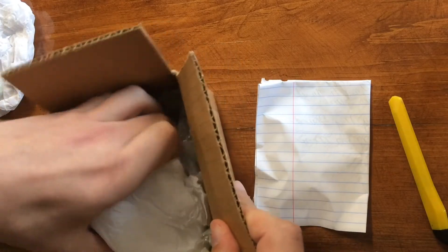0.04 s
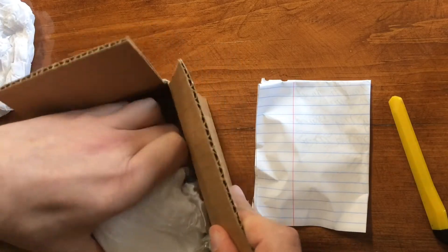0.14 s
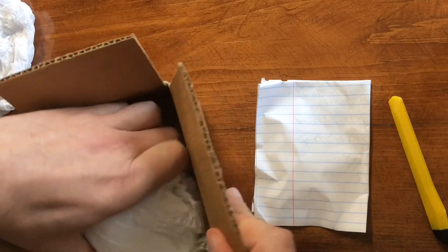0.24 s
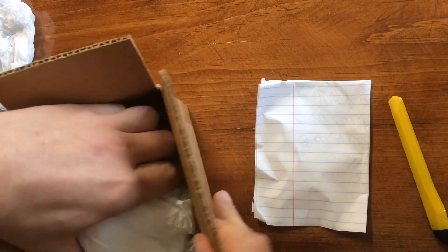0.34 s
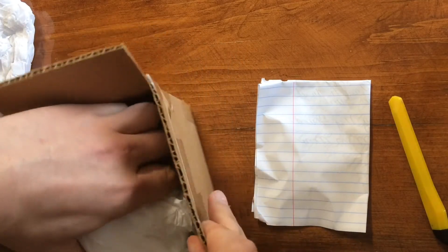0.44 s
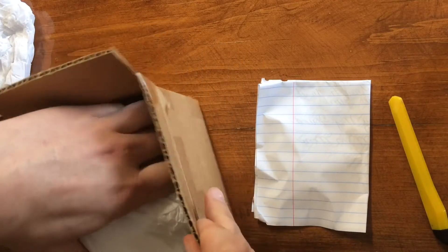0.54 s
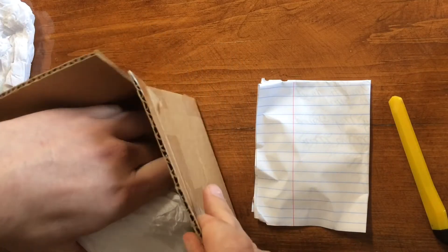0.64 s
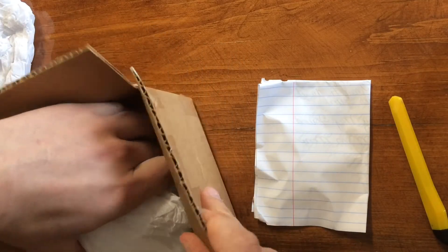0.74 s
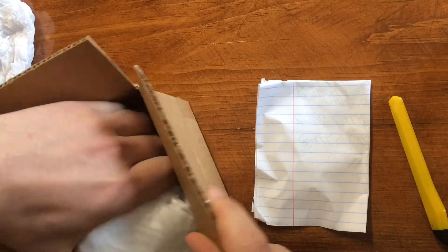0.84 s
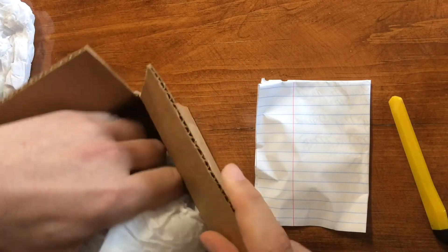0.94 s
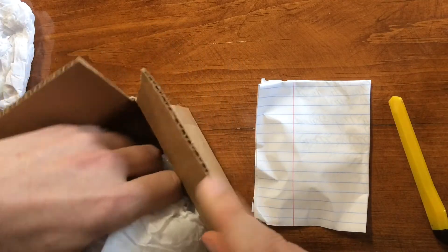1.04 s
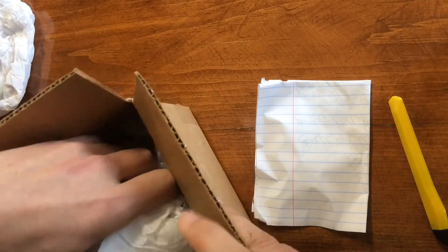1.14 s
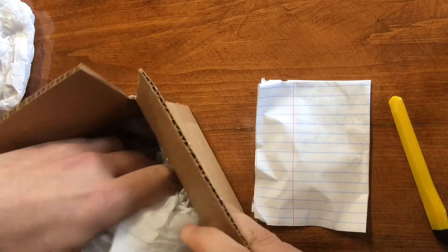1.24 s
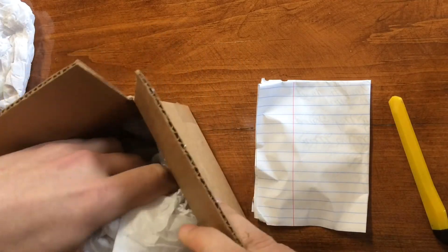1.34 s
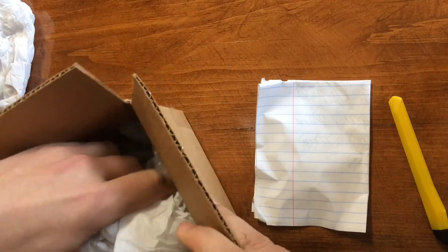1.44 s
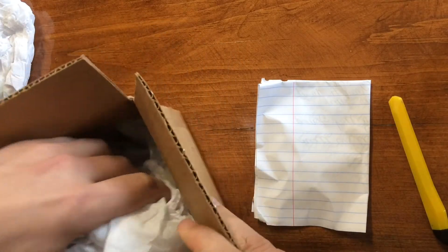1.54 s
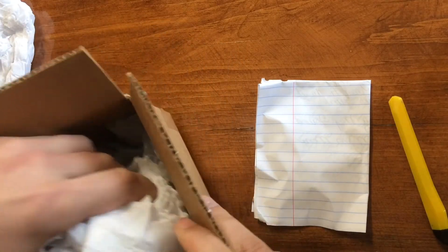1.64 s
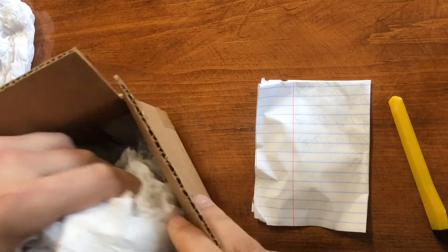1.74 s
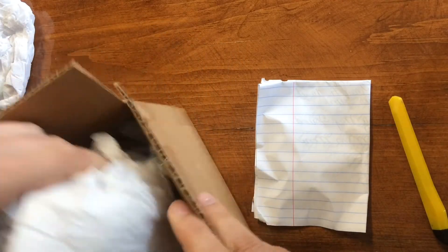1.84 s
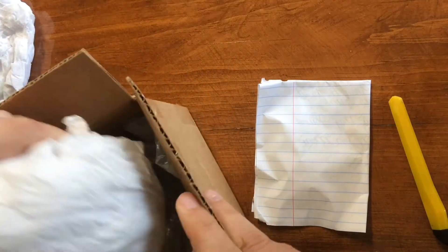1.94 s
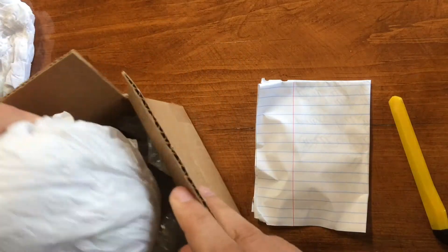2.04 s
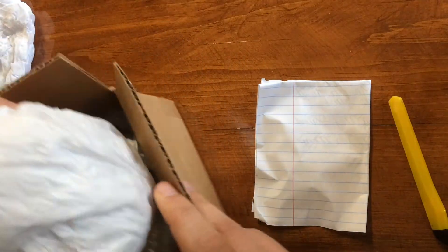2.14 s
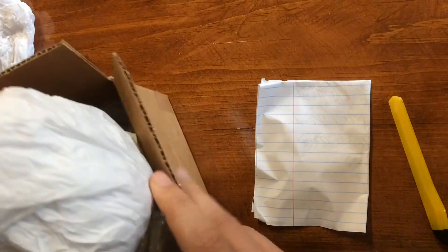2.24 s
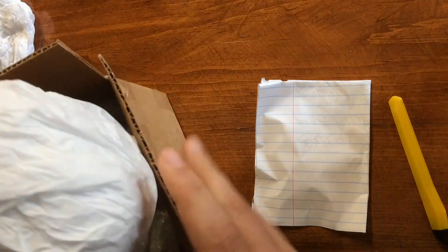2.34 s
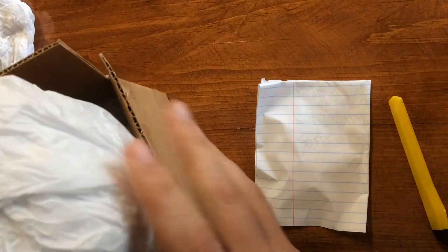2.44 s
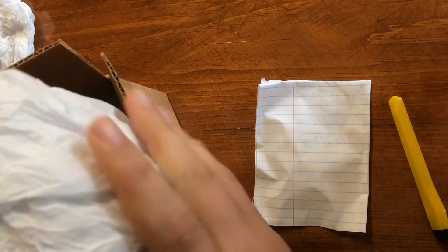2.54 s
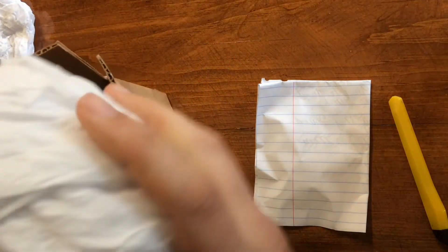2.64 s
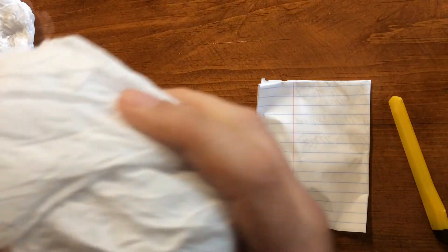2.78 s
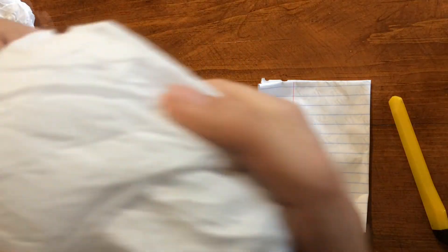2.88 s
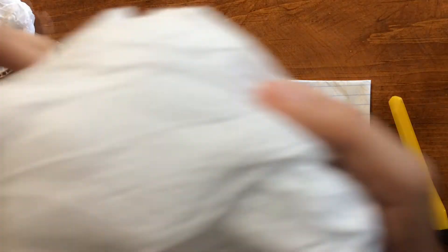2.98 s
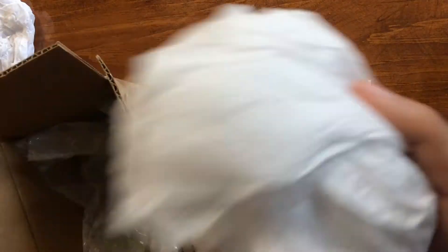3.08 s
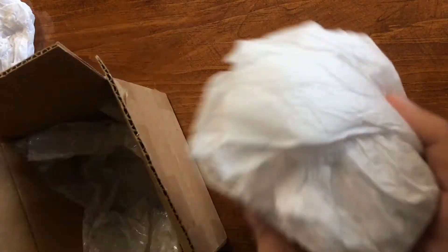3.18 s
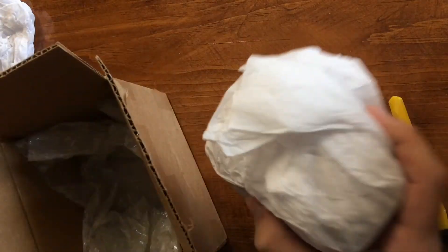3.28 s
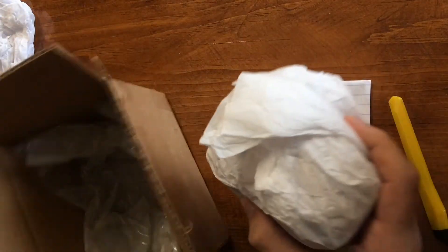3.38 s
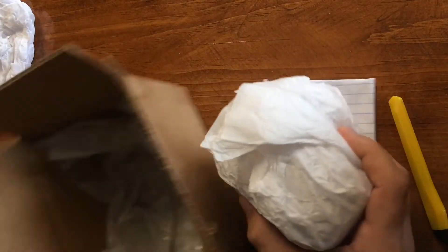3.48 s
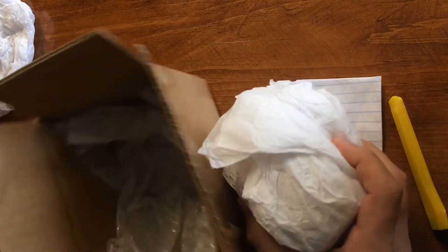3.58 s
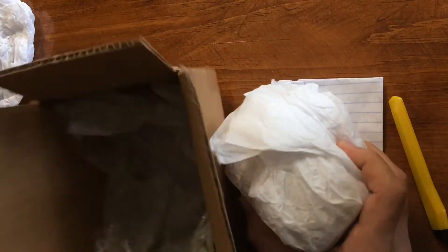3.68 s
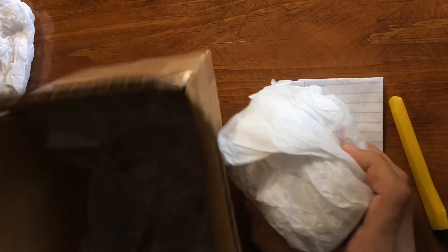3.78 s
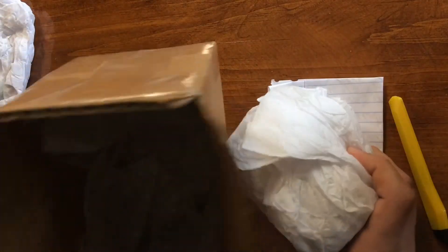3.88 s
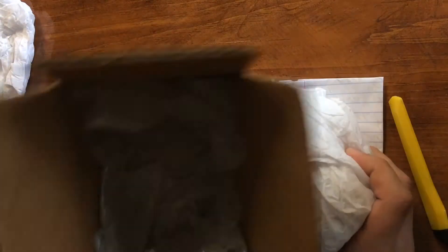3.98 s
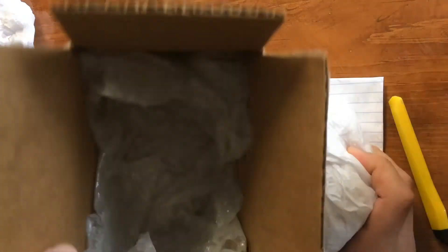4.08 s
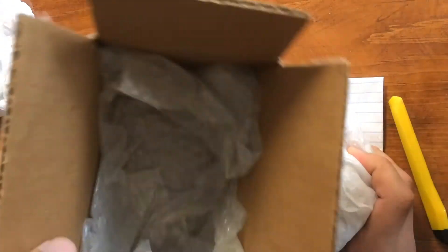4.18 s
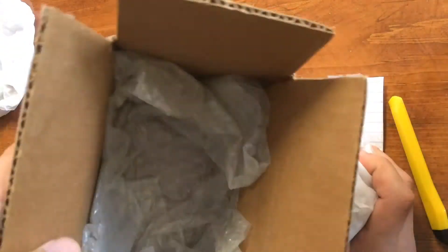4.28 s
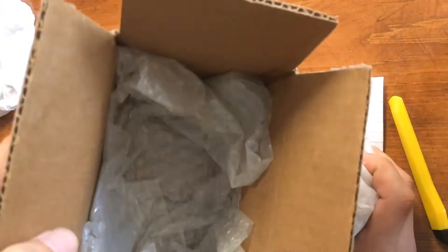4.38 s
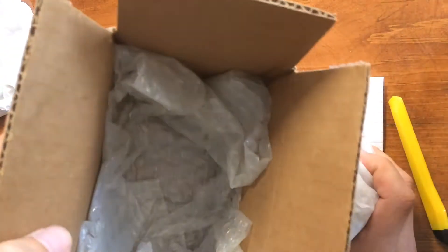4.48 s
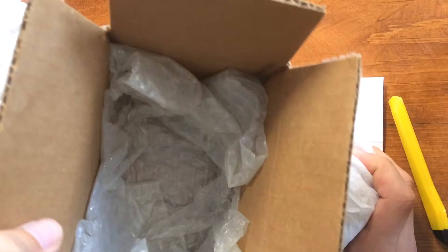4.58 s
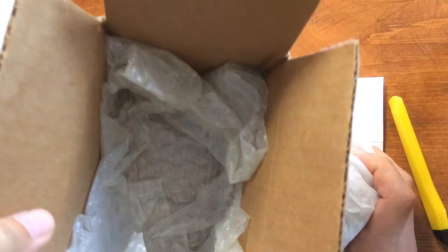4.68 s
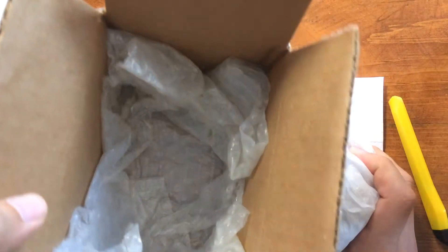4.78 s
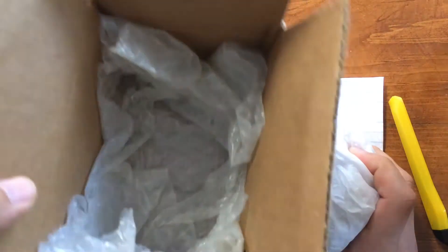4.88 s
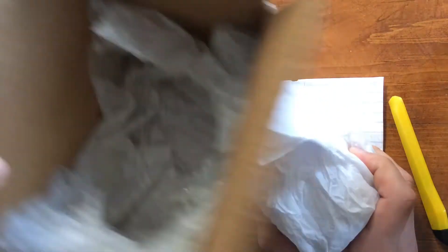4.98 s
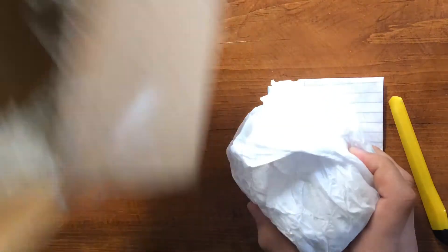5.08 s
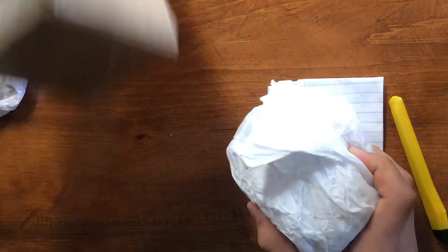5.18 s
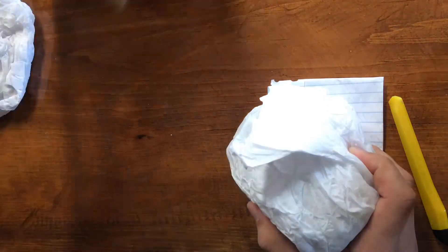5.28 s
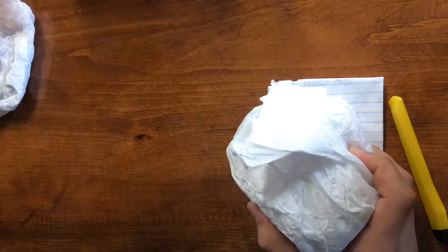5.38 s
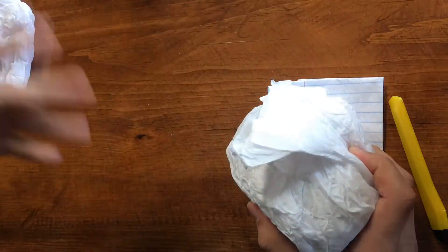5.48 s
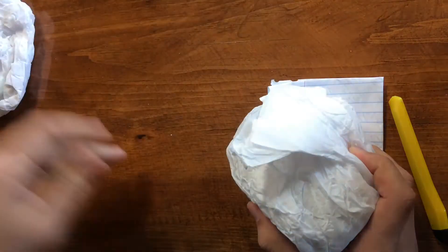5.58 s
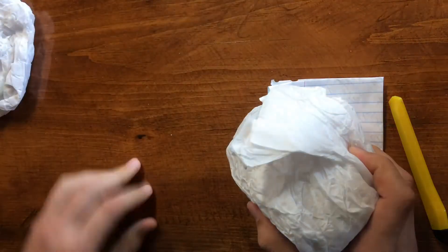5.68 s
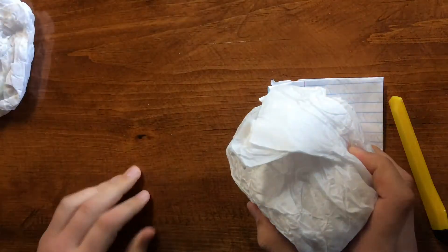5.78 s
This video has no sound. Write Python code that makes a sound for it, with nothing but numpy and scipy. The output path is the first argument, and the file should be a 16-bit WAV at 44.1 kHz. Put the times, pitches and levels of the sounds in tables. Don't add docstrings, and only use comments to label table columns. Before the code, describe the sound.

Close microphone in a quiet, small room. Hands dig in a cardboard box, soft packing paper rustling in busy strokes with crisp snaps. A dull knock as the paper ball comes free, a softer swish, then quieter crinkles and light box bumps as the box is turned. Near the end the box drops with a loud double knock and settles.

```python
import sys
import numpy as np
from scipy import signal
from scipy.fft import rfft, irfft
from scipy.io import wavfile
from scipy.ndimage import uniform_filter1d

SR = 44100
rng = np.random.default_rng(int(sys.argv[2]) if len(sys.argv) > 2 else 0)


def boost(x):
    u = np.asarray(x, float) / 20
    return 10 ** u


def persist_wave(psi):
    counts = np.round(np.clip(psi, -1, 1) * 32767).astype(np.int16)
    wavfile.write(sys.argv[1], SR, np.atleast_2d(counts).T)


N = 256826

# peak in seconds, level in dB, rise in s per 10 dB, fall in s per 10 dB, fullness in dB.
DIG_STROKES = [(.0, -53, .05, 0.17, -1), (0.171, -43.5, 0.1, 0.1, -1), (.375, -42.5, 0.09, .06, -3),
               (.455, -49.5, 0, 0.07, -4), (.53, -48.5, 0.04, 0.14, 0.5), (.6, -46, 0.03, 0.12, -3),
               (0.711, -47.5, .08, 0.1, -1), (.91, -42, 0.09, 0.12, 3.5), (1.16, -50, 0.18, 0.16, 0),
               (1.301, -42.5, .12, 0.0569, 3), (1.43, -45, .1, 0.05, 0), (1.55, -50, .2, .2, -3),
               (1.73, -47, 0.18, 0.14, -2), (1.901, -43, 0.23, 0.0055, -1)]
LIFT_STROKES = [(2.01, -55, 0.7, .05, -12), (2.168, -47.5, 0.03, -0.01, -4), (2.25, -59.5, .03, .1, -7),
                (2.335, -56.5, .08, 0.06, 1), (2.45, -63.5, 0.3, -0.4, 4), (2.59, -52, 0.07, -0.05, -1),
                (2.708, -46.5, 0.0846, 0.15, -3.5), (2.942, -41.5, 0.1864, 0.06, -3),
                (3.02, -45.5, .2, -0.05, 3), (3.14, -61.5, -0.1, 0.2, -4), (3.26, -55, 0.1, -0.4, -12),
                (3.33, -67, 1.2, 0, -9)]
TURN_STROKES = [(3.435, -62, -0.05, 0.14, 7), (3.58, -49.5, 0.08, .3, -1), (3.79, -44.5, 0.22, 0.17, -0.5),
                (3.88, -53, 0.14, 0.04, -3), (4.033, -47, -0.03, .06, 2.5), (4.11, -58.5, -0.2, 0.11, 4),
                (4.22, -51.5, -0.44, 0.13, 0), (4.31, -53, -0.3, 0.1, 1.5), (4.4, -63.5, -1, -0.1, 11),
                (4.47, -48, -0.17, 0.02, 3), (4.6, -79, .1, -0.7, -2), (4.7, -59, .06, 0.17, 1.5),
                (4.79, -57.5, 0.17, 0, 3.5), (4.93, -55, .12, 0.11, 1), (5.03, -53.5, 0.12, 0.07, -4.5),
                (5.09, -58.5, 0.1, .012, -2)]
SHAKE_STROKES = [(5.23, -57.5, -0.5, 0.15, 5), (5.27, -45.5, -0.02, 0.05, 3),
                 (5.302, -38.5, -0.01, .008, -8.5), (5.333, -50, -0.08, 0, -8),
                 (5.374, -42.5, -0.03, 0.0047, 4), (5.401, -44, -0.0335, 0.0272, -14),
                 (5.49, -44, -0.0059, .012, 3), (5.55, -63, -0.24, 0.07, 5.5), (5.65, -70, -0.8, 0.06, 3),
                 (5.704, -58.5, -0.08, -0.02, -1), (5.801, -68, 0.2, 0.5, -1)]
# time in seconds, brightening by stretch in dB, rub on the box wall in dB.
GRIP = [(0, -0.5, -7.5), (1.0, -5, -5.5), (1.5, -2.5, -9.5), (1.9, 0, -6.5), (2.3, 1, -2), (2.6, -1.5, -25),
        (2.95, -3.5, -12), (3.3, -1, -17), (3.55, -7.5, -4.5), (3.85, 2.5, -20), (4.3, -5, -4),
        (4.7, -6, -2), (5.1, 0, -0.5), (5.33, -3, -5.5), (5.45, -8, 12), (5.82, 5, 13.5)]
# frequency in Hz, level in dB.
FIZZ_SPECTRUM = [(1500, -7.5), (3000, -1.5), (5000, -3), (7000, -8), (9000, -18.5), (16000, -57)]
SHEEN_SPECTRUM = [(4000, -9), (7000, 0.5), (10000, 2.5), (13000, 2.5), (16000, -5.5)]
BODY_SPECTRUM = [(400, -52), (800, 0.5), (1400, 5), (2500, -6), (4000, -7.5), (8000, -5.5)]
SCRAPE_SPECTRUM = [(120, -14), (250, 6), (500, 5), (800, 0.5), (1500, -33.5)]
# frequency in Hz, width in Hz, level in dB.
BOX_AIR = [(983, 73, 0.5), (2200, 310, -0.5), (5100, 88, -9.5)]
FOLD_HZ, FOLD_HZ_PER_DB = 1500, -40

# start in seconds,
# peak in dB, pitch in Hz.
CREASE_SNAPS = [(0.029, -29, 5300), (.053, -28, 7500), (.1186, -31, 4400), (.1506, -9, 10100),
                (0.2065, -14.5, 6200), (0.315, -38, 1720), (0.4303, -15.5, 4600), (.4574, -27.5, 2720),
                (.6155, -21.5, 4560), (.7003, -18.5, 6400), (.766, -32, 2240), (0.8585, -38, 1510),
                (1.05, -17, 6730), (1.065, -25.5, 3720), (1.0984, -36, 2200), (1.2027, -28, 4710),
                (1.3673, -30, 2150), (1.497, -30.5, 2200), (1.724, -32, 1610), (1.7985, -32, 2480),
                (1.9704, -41, 1827), (2.0901, -43, 2500), (2.16, -30, 5980), (2.2074, -45, 2510),
              (2.2348, -32, 7260), (2.3156, -37.5, 1700), (2.6155, -23.5, 3200), (2.6569, -33, 1780),
              (2.7392, -30, 2720), (2.8993, -25, 5615), (2.9412, -18, 2100), (3.0425, -36, 2080),
              (3.1053, -48, 2350), (3.1303, -32, 2940), (3.1567, -41, 3170), (3.1901, -36, 2900),
              (3.2575, -22.5, 4320), (3.4246, -39, 1550), (3.472, -37, 3700),
                (3.6267, -45, 1940), (3.699, -29, 3957), (3.7918, -27, 7400), (3.9943, -35, 3385),
              (4.0213, -20, 7050), (4.2203, -33.5, 1720), (4.4566, -30.5, 4000), (4.468, -31, 4500),
              (4.7092, -42, 1630), (4.9246, -28.5, 4540), (5.003, -33, 3600), (5.0235, -26.5, 3860),
              (5.1195, -36, 3420), (5.226, -42, 2040), (5.2664, -31.5, 1690), (5.3728, -30, 1550),
              (5.465, -39, 1830), (5.564, -48, 1740), (5.657, -50, 6500), (5.7005, -42, 1660),
              (5.7783, -55, 4240), (5.7954, -43.5, 1800)]
# start in seconds, peak in dB, pitch in Hz.
FLAP_CLICKS = [
    (1.919, -14.5, 1720),
    (3.5797, -22.5, 2400),
    (5.2999, -25, 1920),
    (5.3989, -6.5, 1855),
    (5.488, -28, 1860),
]
CRACK_DB, CRACK_DB_PER_OCT, FLAP_CRACK_DB = 2, -6.0, -2.5
# frequency in Hz, level in dB, t60 in seconds.
FLAP_RING = (1940, -39.5, 0.51)

# start in seconds, peak in dB,
# struck panel in Hz, hard upper modes in dB.
BUMPS = [(.183, -39, 511, -7), (0.47, -34, 990, -22), (.594, -37.5, 388, -15), (.618, -30.5, 195, -30),
         (1.078, -34.5, 124, -2), (1.284, -30.5, 324, -18), (2.165, -50, 790, -22), (3.256, -45, 110, -22),
         (3.432, -39.5, 420, -4), (3.446, -32.5, 149, -19), (3.476, -32.5, 148.8, -29),
         (3.555, -39, 371, -6), (3.5653, -29.5, 1110, -13), (3.58, -31.5, 980, -29),
         (3.648, -29.5, 170, -20), (3.669, -38, 178, -16), (3.694, -33.5, 179, -11), (3.831, -42, 212, -16),
         (4.219, -42.5, 126, -3), (5.0306, -33.5, 440, -2.5), (5.272, -42.5, 392, 4.5),
         (5.366, -21.5, 110, -31), (5.4463, -23.5, 328, -11), (5.488, -36, 880, -5), (5.531, -39, 629, 3),
         (5.566, -32, 259, -15)]
# start in seconds, peak in dB,
# struck panel in Hz, hard upper modes in dB, t60 in seconds.
KNOCKS = [
    (1.9204, -18, 348, .5, 0.036),
    (2.317, -32.5, 408, -9, 0.039),
    (5.046, -23.5, 171.6, -6.5, 0.044),
    (5.374, -3.5, 261, -9, 0.036),
    (5.401, -2.5, 204.4, -7, 0.053),
    (5.7007, -27, 213, -1, 0.02),
]
# frequency in Hz, level in dB, t60 in seconds.
CARD_MODES = [(378, 4.5, 0.023), (572, -2, 0.02), (689, -6, 0.026), (917, -4.5, 0.018),
              (1270, -19.5, 0.033), (1780, -11, 0.017), (2175, -23, 0.027)]
# frequency in Hz, t60 in seconds.
TABLE_TOP = (211, 0.082)
# frequency in Hz, level relative to the table-top mode in dB, t60 in seconds.
LEG_THUD = (63, -15, 0.062)
PANEL_T60_S, PANEL_T60_FALL = 0.037, 0.59
TOP_DB, TOP_PER_HARD = -8, .45

# peak in seconds, level in dB, swell in s per 10 dB,
# frequency in Hz.
RUBS = [(1.24, -57, 0, 181), (1.48, -48, 0.11, 179), (1.72, -51, 0.14, 182), (1.93, -45, 0.0447, 178),
        (2.1, -51, 0.1, 168.6), (2.42, -54.5, 0.1, 165.6), (2.62, -58, -0.1, 166), (2.97, -43, 0.02, 168),
        (3.16, -51.5, 0, 166), (3.39, -53.5, -0.03, 165), (3.49, -60, -0.05, 159), (3.67, -42, 0.02, 172),
        (3.84, -60, -0.14, 178), (4.27, -61.5, .1, 178), (4.399, -54, .03, 164), (4.54, -55, 0, 165),
        (4.7, -64, .07, 161), (4.86, -69, 0.2, 165)]
# time in seconds, frequency in Hz, level in dB.
ROCKING = [
    (5.42, 197.8, -9.5),
    (5.425, 200, -37),
    (5.477, 203.8, -24.5),
    (5.502, 198.6, -70),
    (5.536, 198.3, -37),
    (5.66, 200, -78),
]

# frequency in Hz, t60 in seconds.
ROOM_DECAY = [(100, 0.63), (400, 0.19), (2000, 0.25), (8000, 0.19), (16000, 0.4)]
# frequency in Hz, level in dB per Hz.
AIR_SPECTRUM = [(12, -46), (20, -12.5), (163, 2), (270, -17), (446, -19), (698, -17.5), (802, -36),
                (1330, -18), (3440, -34), (6540, -31), (13500, -44), (14700, -32), (16000, -61)]
AIR_DB = -58
# lower edge in Hz, upper edge in Hz.
MIC_HZ = (110, 15550)


def evened(x):
    return x / np.sqrt(np.mean(x ** 2) + 1e-20)


def read(points, hz):
    f, value = np.transpose(points)
    return np.interp(np.log(hz + 1), np.log(f + 1), value)


def add(mix, s, sound):
    part = mix[round(s * SR):][:len(sound)]
    part += sound[:len(part)]


def colour(x, points, lift_db=0):
    hz = np.fft.rfftfreq(len(x), 1 / SR)
    gain = boost(read(points, hz) + lift_db)
    return evened(irfft(rfft(x) * gain, len(x)))


def wander(seconds):
    size = max(int(seconds * SR), 2)
    once = uniform_filter1d(rng.standard_normal(N), size)
    return evened(uniform_filter1d(once, size))


def swell(s, db, rise, fall):
    t = np.arange(N) / SR - s
    steps_down = np.where(t < 0, -t / max(rise, .002), t / max(fall, .002))
    return boost(db - 10 * steps_down) ** 2


def resonate(x, hz, width):
    turn = np.exp(2j * np.pi * np.cumsum(hz) / SR)
    r = np.exp(-np.pi * width / SR)
    return 2 * (turn * signal.lfilter([1 - r], [1, -r], x / turn)).real


def crumple(per_s, spread_db, clump_db, smooth):
    clumps = boost(clump_db * wander(0.021))
    strength = boost(spread_db * np.minimum(rng.exponential(1, N), 5))
    buckles = strength * (rng.random(N) < per_s / SR)
    burst = np.sqrt(signal.lfilter([1], [1, -np.exp(-1 / (0.002 * SR))], buckles ** 2))
    envelope = (smooth + evened(burst)) / np.sqrt(smooth ** 2 + smooth + 1)
    return rng.standard_normal(N) * clumps * envelope


def patchy(x, patchy_db):
    z = signal.stft(x, nperseg=256)[2]
    field = uniform_filter1d(rng.standard_normal(z.shape), size=4, axis=0)
    field = uniform_filter1d(field, size=30, axis=1)
    return signal.istft(z * boost(patchy_db * evened(field)), nperseg=256)[1][:N]


def paper():
    power, full = 1e-9, 0
    for s, db, rise, fall, full_db in DIG_STROKES + LIFT_STROKES + TURN_STROKES + SHAKE_STROKES:
        push = swell(s, db, rise, fall)
        power = power + push
        full = full + full_db * push
    level_db, body_db = 10 * np.log10(power), full / power
    s, *grip = np.transpose(GRIP)
    bright_db, scrape_db = (np.interp(np.arange(N) / SR, s, column) for column in grip)
    fold_hz = FOLD_HZ + FOLD_HZ_PER_DB * body_db
    blur = np.clip((level_db + 65) / 11, .2, 1.5)

    hz = np.fft.rfftfreq(N, 1 / SR)
    hollow_db = sum((5.5 + db) / (1 + ((hz - f) / w) ** 2) for f, w, db in BOX_AIR)
    fine = crumple(350, 3.34, 0.5, blur)
    coarse = crumple(250, 3.3, 1.9, blur)
    body = colour(coarse, BODY_SPECTRUM, hollow_db)
    body = evened(body + 0.74 * resonate(body, fold_hz, 440))

    mix = colour(fine, FIZZ_SPECTRUM, hollow_db)
    mix += boost(bright_db - 0.8) * colour(fine, SHEEN_SPECTRUM)
    mix += boost(body_db - 1.1) * body
    mix += boost(scrape_db - 2.5) * colour(coarse, SCRAPE_SPECTRUM)
    return boost(level_db - 0.5) * patchy(mix, 1.49)


def snaps():
    out, t = np.zeros(N), np.arange(400) / SR
    rows = []
    for s, db, hz in CREASE_SNAPS:
        rows.append((s, db, hz, CRACK_DB + CRACK_DB_PER_OCT * np.log2(hz / 3000)))
    rows += [(*flap, FLAP_CRACK_DB) for flap in FLAP_CLICKS]
    noise = signal.lfilter(*signal.butter(1, 5500, fs=SR), rng.standard_normal((len(rows), 400)))
    onset = 1 - np.exp(-t / 0.00044)
    for (s, db, hz, crack_db), hiss in zip(rows, noise):
        ring = np.sin(2 * np.pi * hz * t) * np.exp(-t * hz / 1.88)
        crack = boost(crack_db) * hiss * 0.74 * np.exp(-t / 0.001)
        add(out, s, boost(db + 1.5) * (ring + crack) * onset)
    return signal.lfilter(*signal.butter(2, 1100, "high", fs=SR), out)


def flaps():
    t, out = np.arange(SR // 2) / SR, np.zeros(N)
    hz, ring_db, t60 = FLAP_RING
    buzz = evened(resonate(rng.standard_normal(len(t)), hz + 0 * t, 180))
    buzz = buzz * boost(ring_db - 60 * t / t60)
    for s, db, _ in FLAP_CLICKS:
        add(out, s, boost(db) * buzz)
    return out


def bumps():
    out, t = np.zeros(N), np.arange(12000) / SR
    card = sum(np.sin(2 * np.pi * f * t) * boost(d - 60 * t / t60) for f, d, t60 in CARD_MODES)
    top = np.sin(2 * np.pi * TABLE_TOP[0] * t) * boost(-60 * t / TABLE_TOP[1])
    thud_hz, thud_db, thud_t60 = LEG_THUD
    thud = np.sin(2 * np.pi * thud_hz * t) * boost(thud_db - 60 * t / thud_t60)
    onset = 1 - np.exp(-t / 0.0006)
    light = [(*row, PANEL_T60_S * (300 / row[2]) ** PANEL_T60_FALL) for row in BUMPS]
    for s, db, hz, hard_db, t60 in light + KNOCKS:
        panel = np.sin(2 * np.pi * hz * t) * boost(-60 * t / max(t60, .01))
        below = boost(TOP_DB + TOP_PER_HARD * hard_db) * (top + thud)
        add(out, s, -boost(db) * (panel + boost(hard_db) * card + below) * onset)
    return out


def table():
    t, out = np.arange(N) / SR, 0
    rub_s, _, _, rub_hz = np.transpose(RUBS)
    rock_s, rock_hz, rock_db = np.transpose(ROCKING)
    rubbed = np.sqrt(sum(swell(s, db, span, span) for s, db, span, _ in RUBS))
    rocked = boost(np.interp(t, rock_s, rock_db, -120, -120))
    for s, hz, drive in ((rub_s, rub_hz, rubbed), (rock_s, rock_hz, rocked)):
        turns = np.cumsum(np.interp(t, s, hz) * (1 + 0.013 * wander(0.013))) / SR
        level = uniform_filter1d(drive * boost(2.2 * wander(0.033)), size=150)
        out = out + np.sqrt(2) * level * np.sin(2 * np.pi * turns)
    return out


def room(x):
    taps = np.zeros(SR // 2)
    at = np.arange(200, SR // 2 - 20, 20)
    taps[at + rng.integers(0, 20, len(at))] = rng.choice([-1., 1.], len(at))
    hz, t, z = signal.stft(taps, SR, nperseg=256)
    t60 = np.maximum(read(ROOM_DECAY, hz), .03)[:, None]
    tail = signal.istft(z * boost(-60 * t / t60), SR, nperseg=256)[1]
    return signal.fftconvolve(x, tail / np.linalg.norm(tail))[:N]


def air():
    return boost(AIR_DB + 0.7 * wander(0.054)) * colour(rng.standard_normal(N), AIR_SPECTRUM)


def scene():
    hits, ticks = bumps(), snaps()
    direct = paper() + hits + ticks + flaps() + table()
    return (direct + boost(-13.5) * room(hits) + boost(-14.0) * room(ticks))[None]


def band_limit(x):
    return signal.sosfilt(signal.butter(12, 16370, fs=SR, output="sos"), x)


def record(dry):
    x = signal.lfilter(*signal.butter(2, MIC_HZ[0], "high", fs=SR), dry) + air()
    lowpass = signal.firwin(201, MIC_HZ[1], window=("kaiser", 5), fs=SR)
    x = signal.oaconvolve(x, lowpass[None], "same")
    return band_limit(x)


dry = scene()
out = record(dry)
persist_wave(out)
```